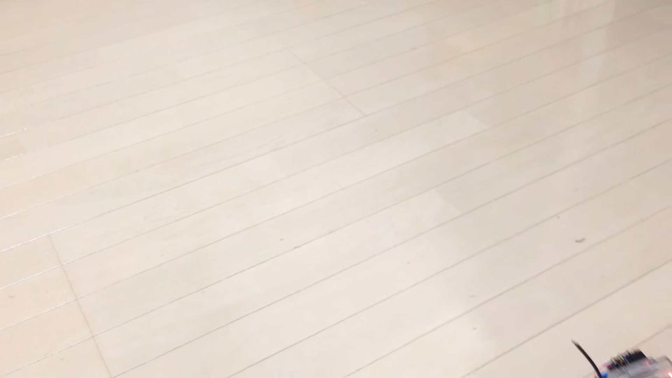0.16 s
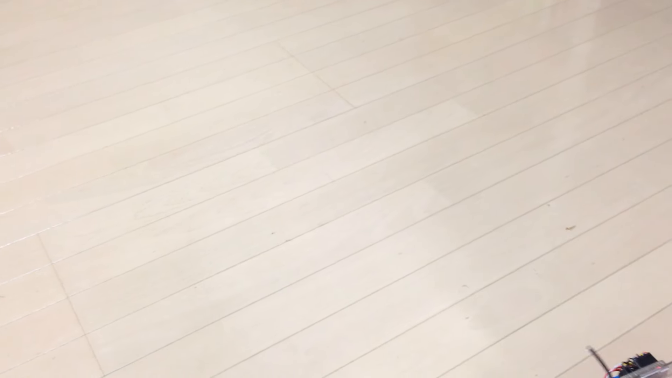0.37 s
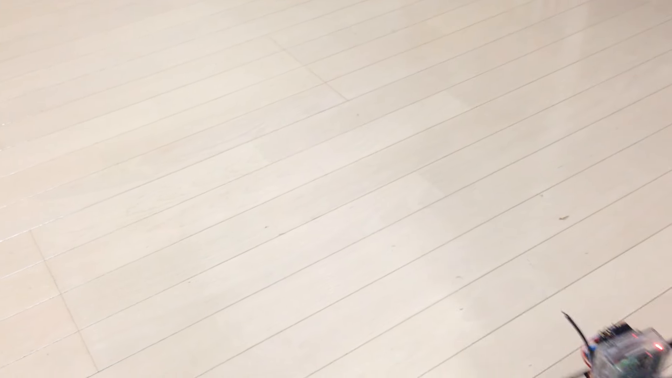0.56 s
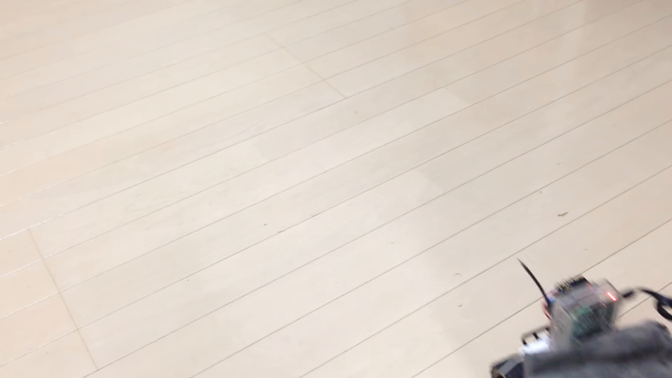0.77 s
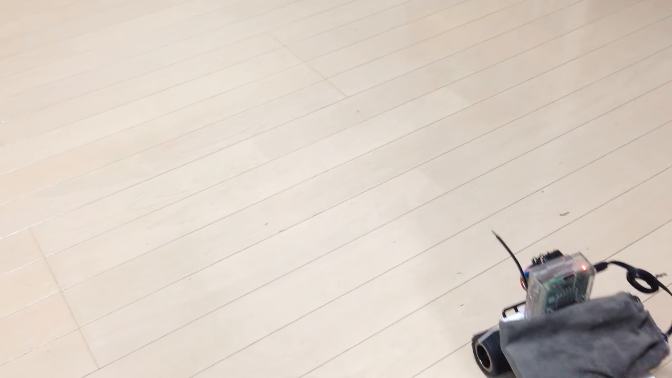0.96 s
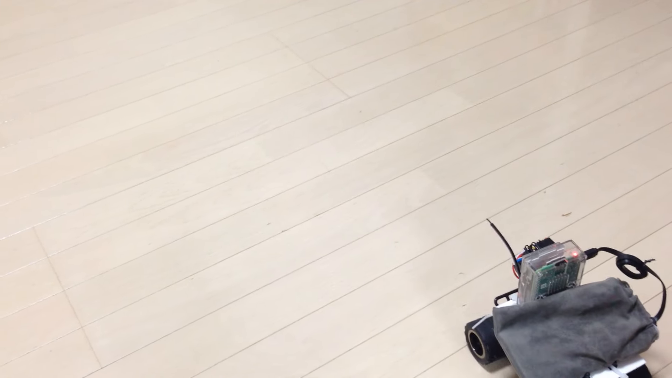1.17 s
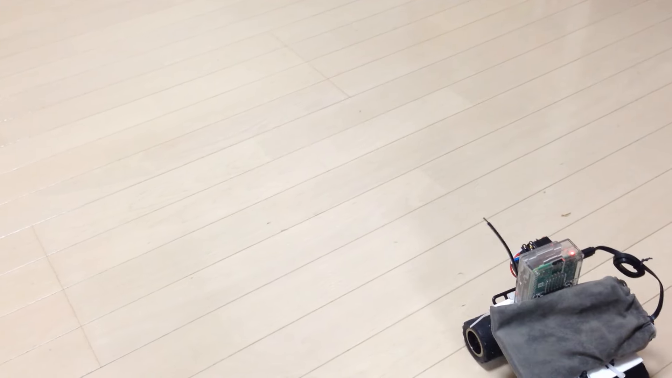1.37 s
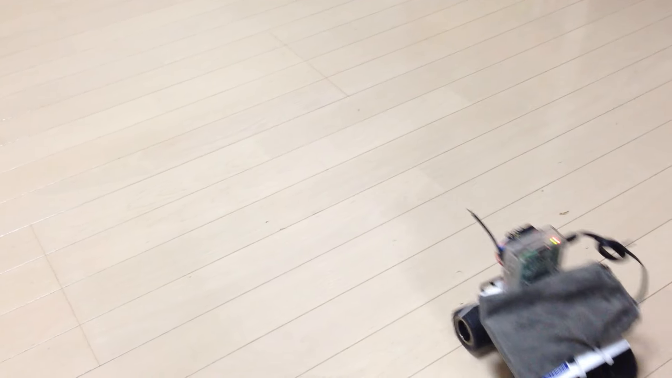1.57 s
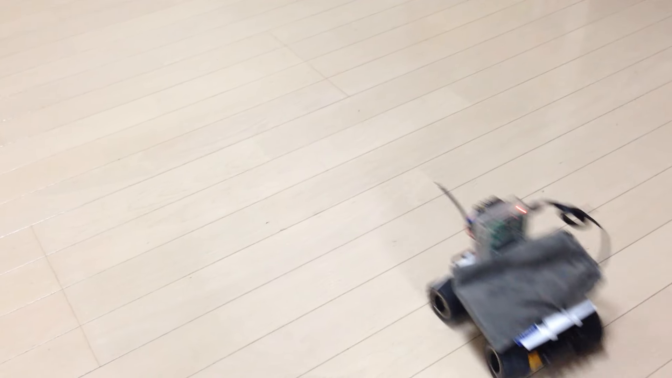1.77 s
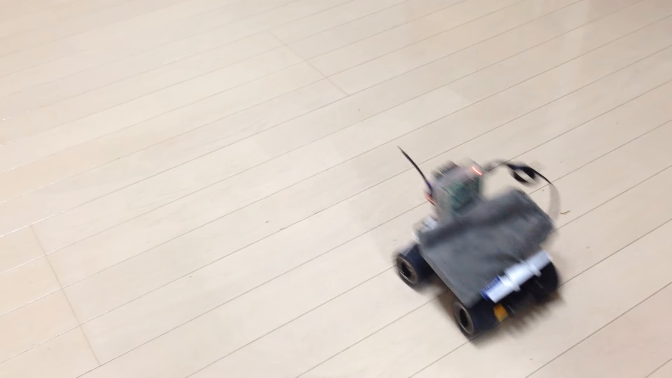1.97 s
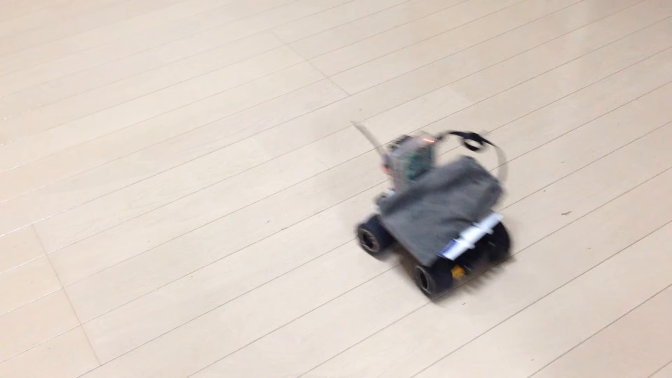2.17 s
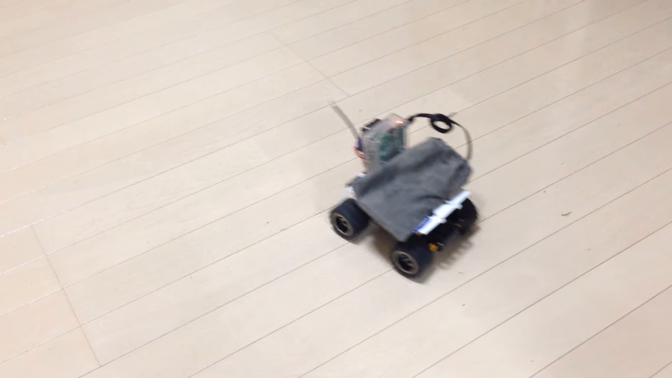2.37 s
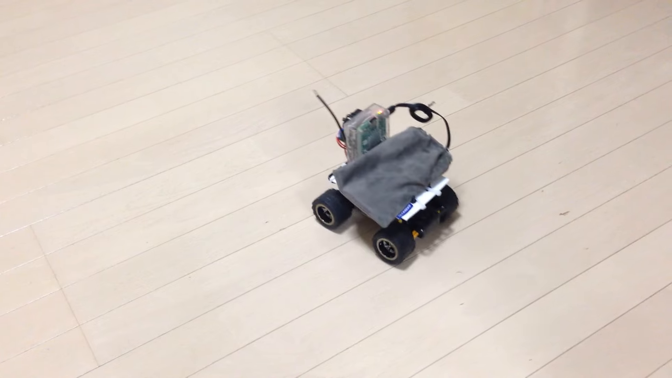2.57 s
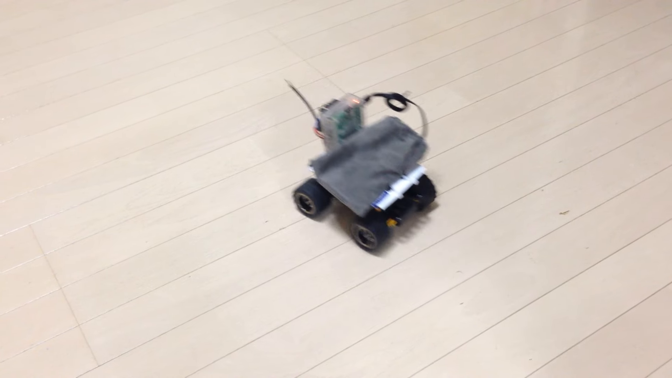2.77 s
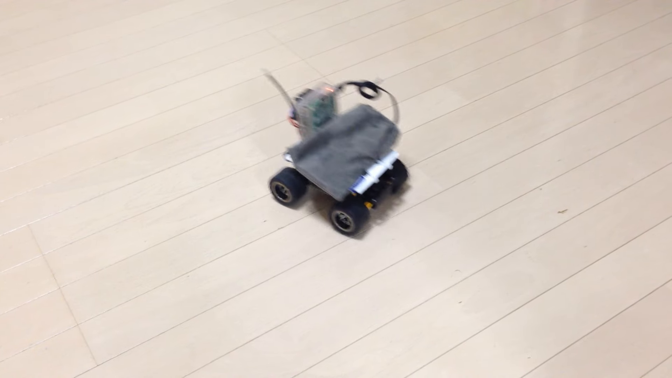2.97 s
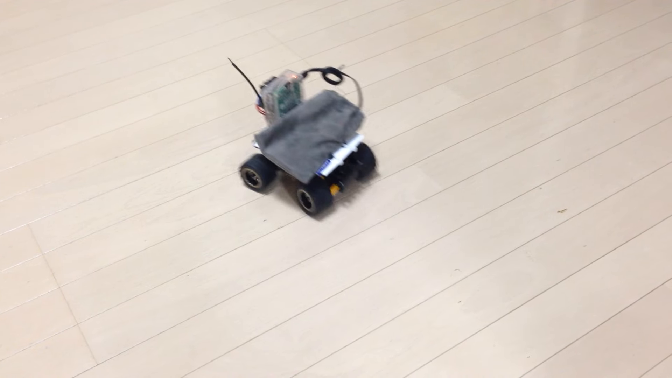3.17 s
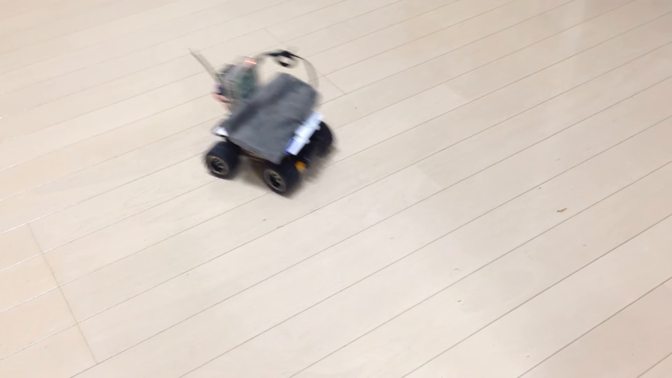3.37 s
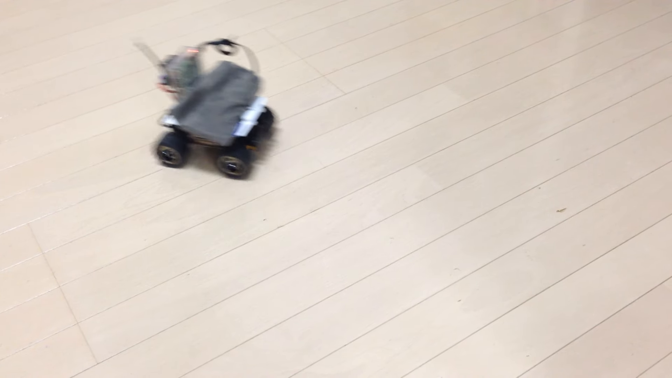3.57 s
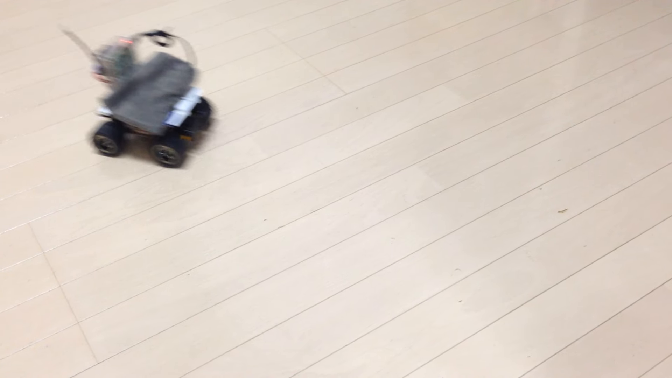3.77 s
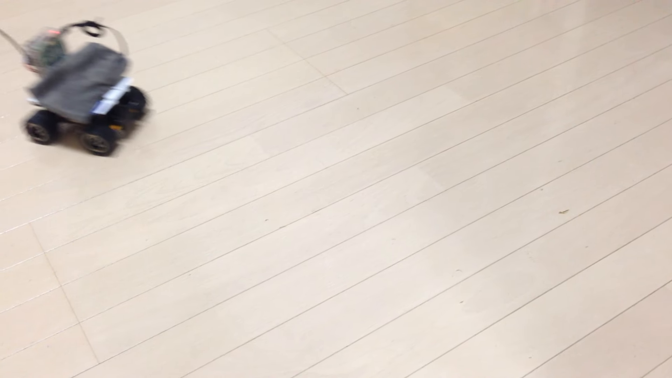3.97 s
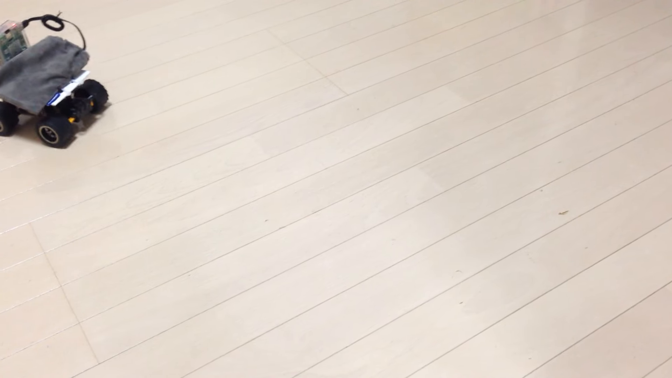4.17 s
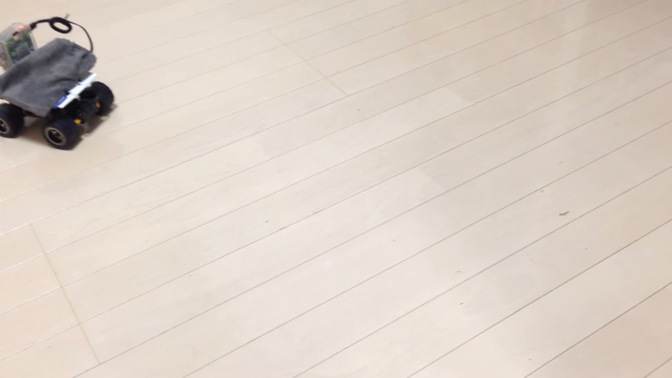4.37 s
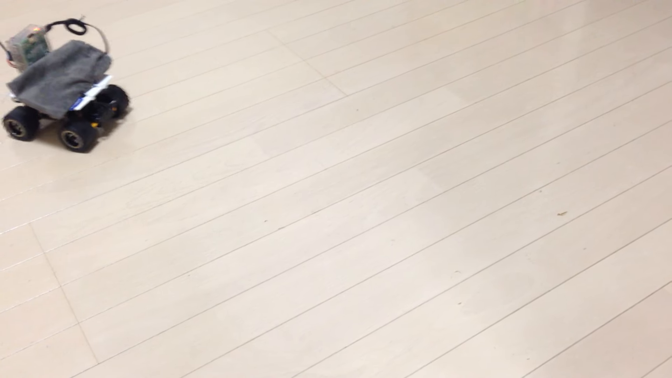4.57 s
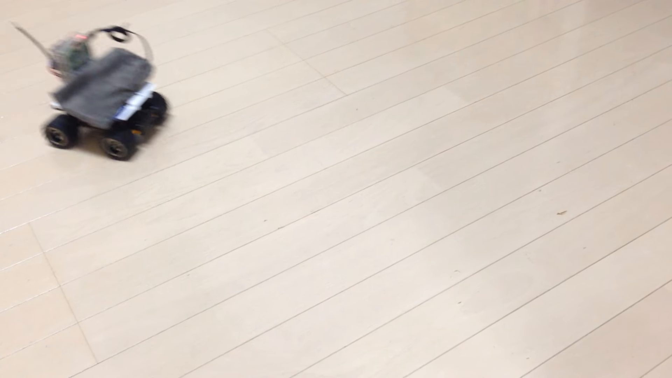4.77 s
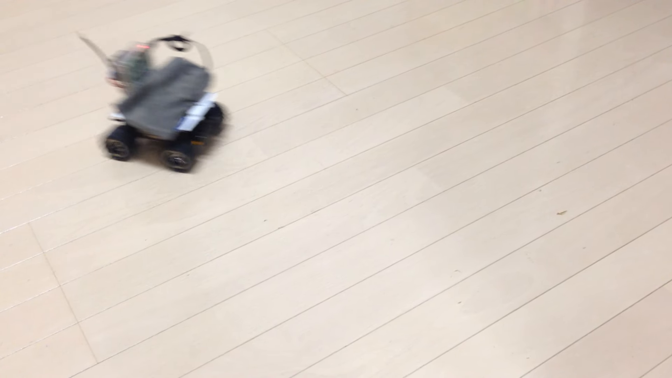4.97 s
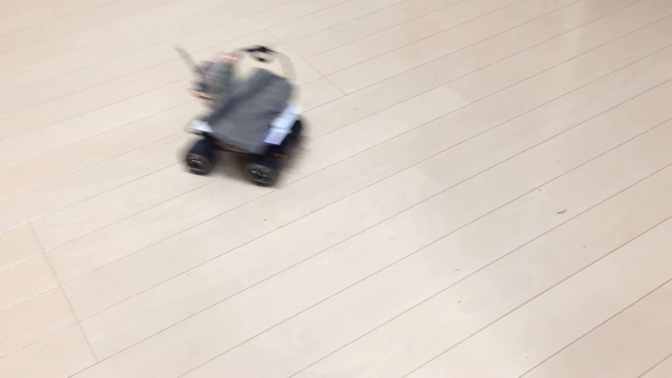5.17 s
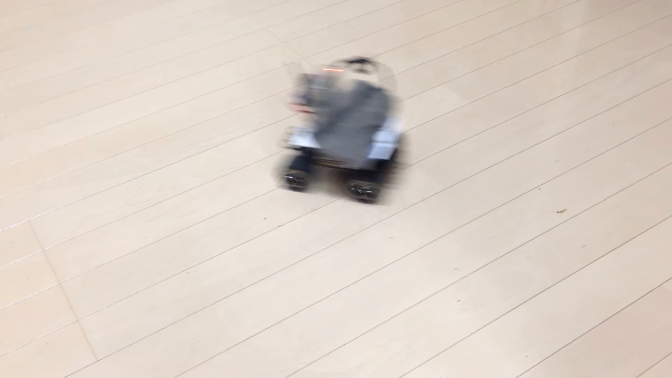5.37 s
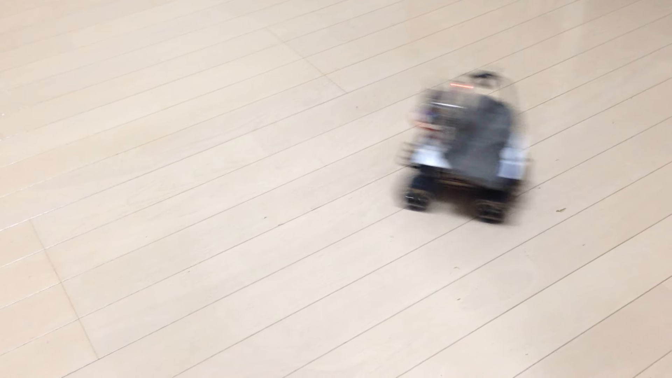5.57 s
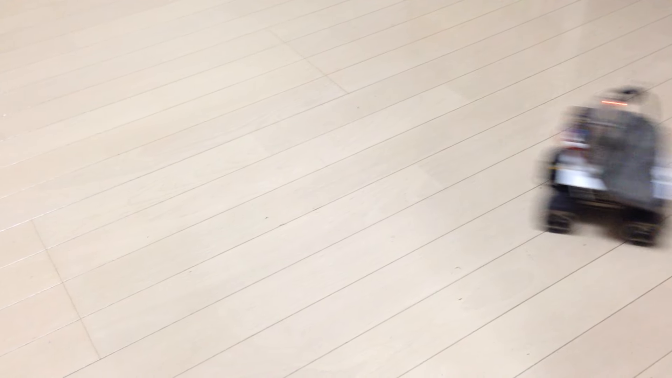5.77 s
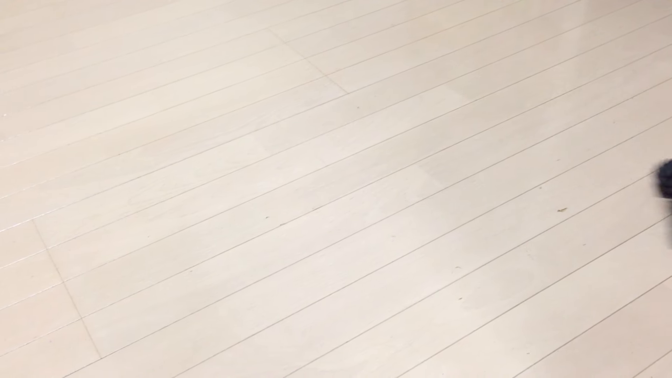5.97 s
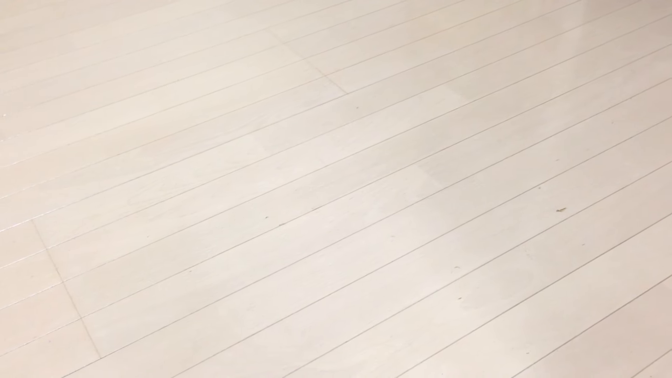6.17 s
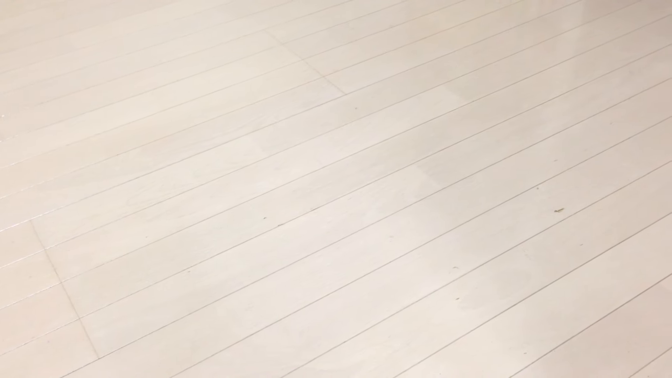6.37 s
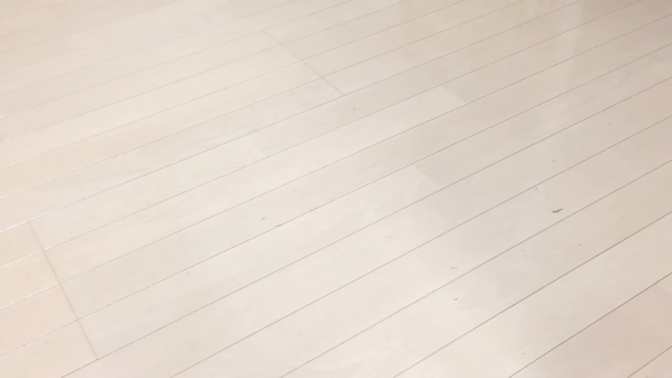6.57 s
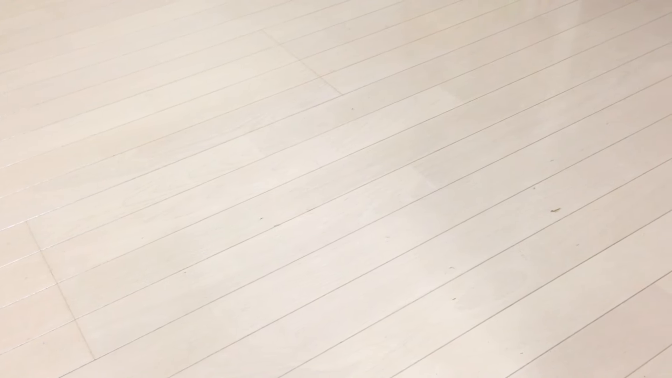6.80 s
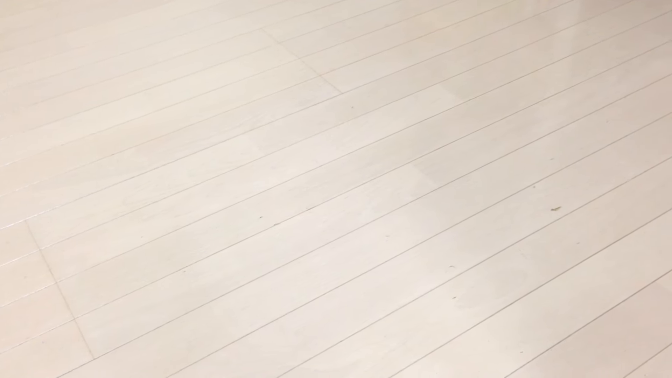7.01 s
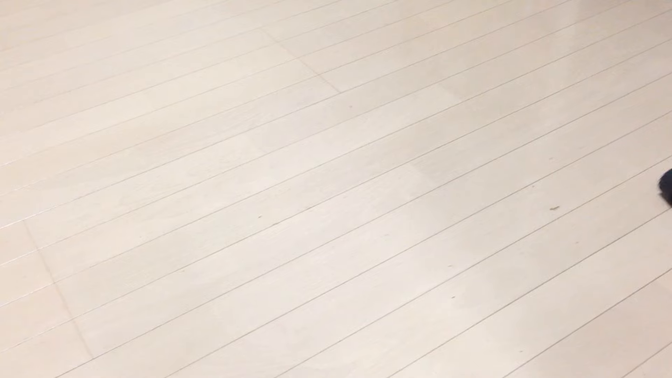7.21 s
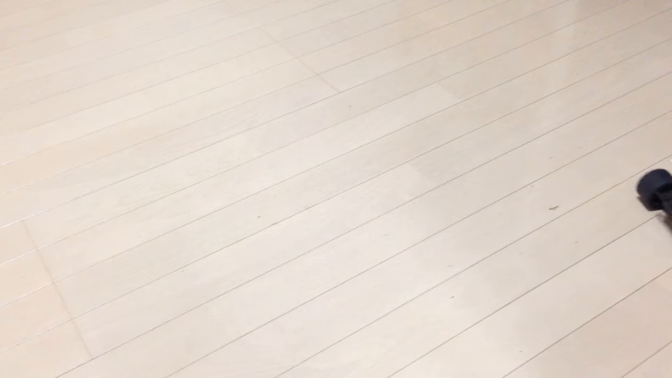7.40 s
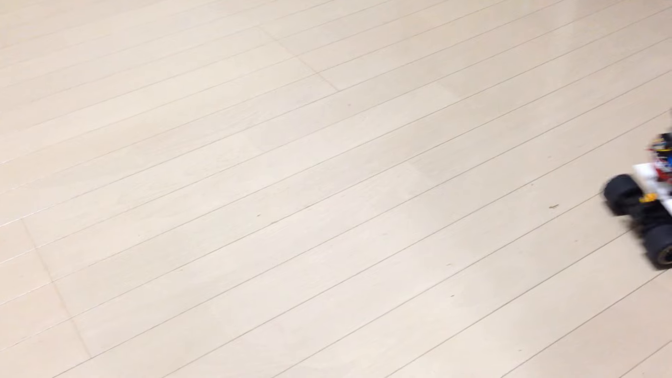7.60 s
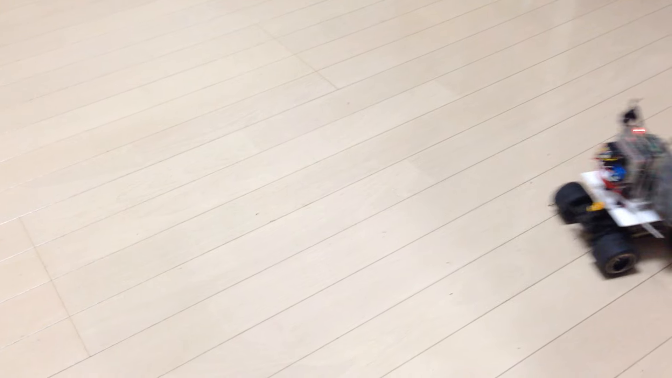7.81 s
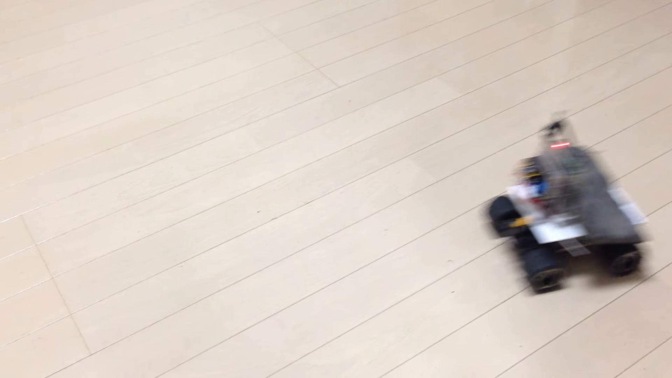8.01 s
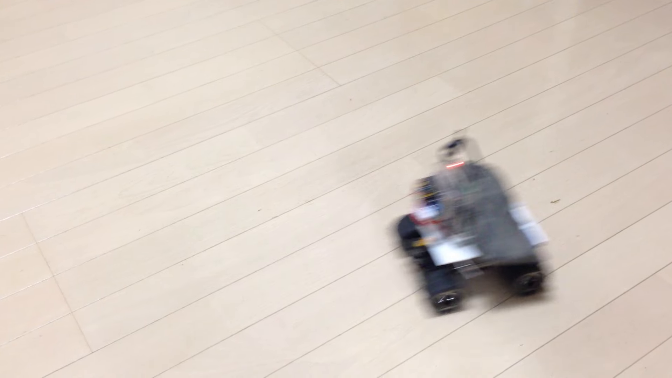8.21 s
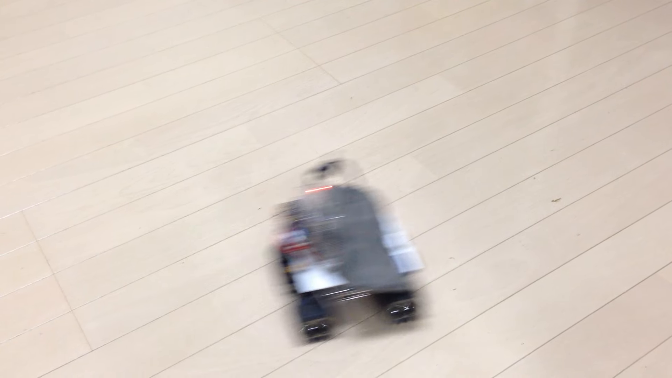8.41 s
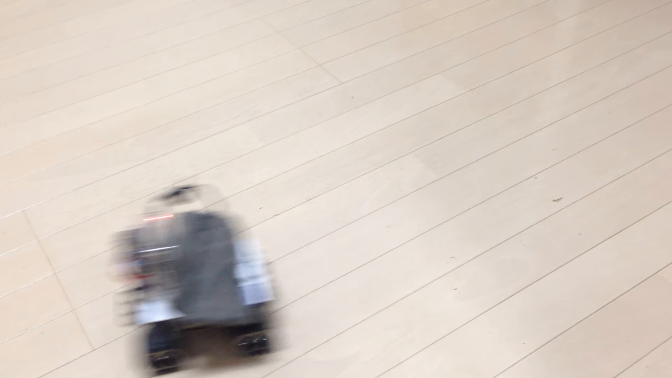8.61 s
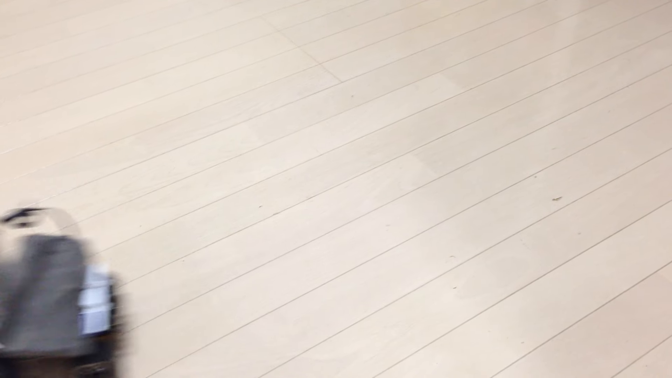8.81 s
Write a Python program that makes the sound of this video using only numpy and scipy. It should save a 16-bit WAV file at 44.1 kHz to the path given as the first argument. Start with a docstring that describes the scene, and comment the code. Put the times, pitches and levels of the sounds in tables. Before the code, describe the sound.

Low rumbling bursts from a toy car's wheels on floorboards, with buzzy gear rattle, brief whines and sharp clicks, stopping and restarting over faint hiss.

```python
"""A low drumming comes first: the tyre lugs of a small toy car, striking a hollow wooden floor in a quiet room.
The car drives in short pushes and rolls on between them; the boards hum and rumble under its wheels.
Plastic gears rattle and sing in the shell, made from tooth impacts, noise and short gliding tones.
Clicks as gear play is taken up, and a knock on the boards, are short decaying rings with a brief room answer.
Microphone hiss and room tone, made from coloured noise, lie under all."""
import sys
import numpy as np
from scipy import signal
from scipy.io import wavfile
from scipy.ndimage import uniform_filter1d

SR = 44100
rng = np.random.default_rng(int(sys.argv[2]) if len(sys.argv) > 2 else 0)


def master(y):
    """Save y as 16-bit WAV."""
    cut = np.clip(np.atleast_2d(y).T, -1, 1)
    pcm = np.round(cut * 32767)  # scale
    wavfile.write(sys.argv[1], SR, pcm.astype(np.int16))


def level_to_linear(level):
    """Convert decibel levels to linear amplitude factors, elementwise."""
    exponent = np.asarray(level, float) / 20
    return 10 ** exponent


N = 390285

# ring of the plastic shell, relative spectrum: f/Hz, level/dB per Hz
SHELL_SPECTRUM = [(1030, -37.5), (1750, -2.5), (2110, 1.5), (2330, 2), (2480, -0.5), (2700, -4), (2930, -2),
                  (3160, 0.5), (4010, 2.5), (4460, -4), (5100, -10.5), (6630, -20), (11200, -120)]
# bright fizz of the gears, relative spectrum: f/Hz, level/dB per Hz
FIZZ_SPECTRUM = [(2820, -36.5), (4800, -4.5), (5040, -5), (5670, -1), (6530, 0), (8530, -0.5), (10700, -5),
                 (11900, -5), (13400, -6.5), (14700, -6), (15400, -51.5)]
# the car rolls on between pushes: t/s, lug rate f/Hz, coasting gears level/dB, coasting tyres level/dB
ROLLING_CAR = [(0.0, 73.4, -58.5, -55.5), (0.45, 67.7, -69.5, -66), (0.8, 69.7, -66.5, -65.5),
               (1.4, 75.6, -71, -71), (1.6, 58.1, -61.5, -64), (1.72, 58.45, -62.5, -62),
               (2.02, 65, -59.5, -55.5), (2.09, 74.9, -61.5, -60), (2.24, 80.8, -63.5, -61.5),
               (2.44, 104.8, -64, -67.5), (2.65, 75, -70, -84), (2.8, 63.6, -66, -59),
               (3.05, 93.5, -67.5, -69), (3.11, 93.2, -80, -63), (3.2, 70.5, -62.5, -59),
               (3.33, 64.7, -62, -65), (3.5, 72.1, -60.5, -62.5), (3.72, 67.6, -58.5, -57.5),
               (3.97, 70.55, -56.5, -58.5), (4.2, 94, -65.5, -59.5), (4.55, 108, -68, -77),
               (5.1, 94, -57.5, -57), (5.32, 84.5, -56, -61), (5.5, 96.5, -53, -53.5), (5.62, 94, -55, -56),
               (5.9, 96.8, -54, -54), (5.98, 84.1, -54, -53.5), (6.16, 75.5, -61.5, -61),
               (6.3, 77.1, -62.5, -56.5), (6.38, 80.8, -60.5, -67), (6.48, 72, -67.5, -72),
               (6.7, 69.3, -72, -83.5), (7.4, 70.7, -69, -72), (7.95, 69.8, -62, -60),
               (8.06, 76.2, -57.5, -54), (8.33, 77.84, -54, -54.5), (8.55, 90.3, -52, -54.5),
               (8.85, 87.6, -56.5, -50.5)]


def evened(x):
    """Scales to rms 1."""
    return x / np.sqrt(np.mean(x ** 2) + 1e-20)


def read(points, hz):
    """Reads a spectrum on a log-frequency axis."""
    f, value = np.transpose(points)
    return np.interp(np.log(hz + 1), np.log(f + 1), value)


def curves(rows):
    """Joins table rows into one curve a column."""
    s, *columns = np.transpose(rows)
    return [np.interp(np.arange(N) / SR, s, c) for c in columns]


def coloured(x, spectrum):
    """Causal minimum-phase filter with the given spectrum, output at rms 1."""
    size = 8192
    hz = abs(np.fft.fftfreq(size, 1 / SR))
    log_gain = np.log(level_to_linear(np.maximum(read(spectrum, hz), -100)))
    taps = np.fft.ifft(np.exp(np.conj(signal.hilbert(log_gain)))).real[:size // 2]
    return evened(signal.oaconvolve(x, taps)[:N])


def resonate(x, hz, width):
    """Shifts hz down to zero, smooths, and shifts back: a resonance of gain 1."""
    turn = np.exp(2j * np.pi * np.cumsum(hz * np.ones(len(x))) / SR)
    r = np.exp(-np.pi * width / SR)
    return 2 * (turn * signal.lfilter([1 - r], [1, -r], x / turn)).real


def drift(seconds):
    """Chance wandering: noise smoothed twice over the given time, rms 1."""
    size = max(round(seconds * SR), 1)
    return evened(uniform_filter1d(uniform_filter1d(rng.standard_normal(N), size), size))


def effort(rows, db, coast_db, rise_s, swell_db, fall_db_per_s, added_swell_db=0):
    """Gain of one layer: every event rises, swells (or sags) while it holds and falls, over the coasting level."""
    start, on = np.transpose(rows)[:2, :, None]
    grid_s = np.arange(0, N / SR, .001)
    t = grid_s - start
    level_db = db[:, None] + (swell_db + added_swell_db) * (np.clip(t / on, 0, 1) - .5)
    level_db = level_db - fall_db_per_s * np.maximum(t - on, 0)
    power = (np.clip(t / rise_s, 0, 1) * level_to_linear(level_db)) ** 2
    return np.sqrt(np.interp(np.arange(N) / SR, grid_s, power.sum(0)) + level_to_linear(coast_db) ** 2)


def hiss():
    """Steady noise of the room tone and the microphone."""
    # relative spectrum: f/Hz, level/dB per Hz
    hiss_spectrum = [(20, -71), (45, 2.5), (75, 0.5), (150, -11), (300, -8), (550, -11.5), (900, -20.5),
                     (1800, -27), (3400, -20.5), (5400, -24.5), (15400, -24)]
    return level_to_linear(-62.5) * coloured(rng.standard_normal(N), hiss_spectrum)


def room(x):
    """Sparse reflections of random sign, each band dying at its own speed."""
    # reverberation of the room: f/Hz, t60/s
    decay_times = [(100, 0.31), (1000, 0.39), (4000, 0.17), (12000, 0.11)]
    taps = np.zeros(SR // 2)
    at = np.arange(150, len(taps) - 20, 20)
    taps[at + rng.integers(0, 20, len(at))] = rng.choice([-1., 1.], len(at))
    hz, t, z = signal.stft(taps, SR, nperseg=256)
    t60 = np.clip(read(decay_times, hz), .05, 1)[:, None]
    tail = signal.istft(z * level_to_linear(-60 * t / t60), SR, nperseg=256)[1]
    return signal.fftconvolve(x, tail / np.linalg.norm(tail))[:N]


def knock():
    """A wheel knocks once on the boards, a dull blow that rings their modes."""
    # board modes: f/Hz, level/dB, t60/s
    knock_modes = [(113, -4, 0.18), (199.4, 3.5, 0.098), (244, -36, 0.064), (443, -9, 0.018)]
    t = np.maximum(np.arange(N) / SR - .1735, 0)
    ring = sum(level_to_linear(db - 60 * t / t60) * np.sin(2 * np.pi * hz * t) for hz, db, t60 in knock_modes)
    return level_to_linear(-32) * ring


def sings():
    """Gears or boards sing at one resonance: a rough, wavering tone swells, sags a little in pitch and fades."""
    # brief tones: t/s, length t/s, middle f/Hz, level/dB
    tones = [(0.139, 0.05, 1125, -51), (2.21, 0.094, 3700, -61.5), (3.321, 0.049, 1770, -58),
             (3.704, 0.042, 1430, -58), (3.81, 0.079, 1002, -59), (3.879, 0.063, 2220, -62),
             (5.114, 0.034, 1083, -52.5), (5.353, 0.073, 1760, -56), (5.524, 0.044, 3200, -49),
             (5.699, 0.071, 1158, -56), (5.71, 0.085, 2310, -52), (5.855, 0.06, 1874, -61),
             (5.9, 0.086, 1864, -55), (5.785, 0.12, 1030, -68), (6.285, 0.063, 1010, -61),
             (6.9, 0.054, 988, -60), (6.94, 0.045, 1693, -63), (3.08, 0.096, 204, -58),
             (0.17, 0.07, 195, -51), (3.711, 0.038, 3750, -57), (3.826, 0.026, 3050, -55),
             (3.823, 0.03, 5400, -57), (8.18, 0.082, 1570, -55), (7.135, 0.05, 1195, -68),
             (6.175, 0.056, 1940, -56), (6.328, 0.062, 1234, -58.5), (8.134, 0.057, 5660, -59.5),
             (8.303, 0.049, 3690, -49), (8.456, 0.043, 3240, -51.5), (8.476, 0.16, 2030, -57),
             (8.631, 0.072, 2310, -45), (8.66, 0.067, 1031, -54.5), (0.69, 0.06, 1520, -63),
             (1.083, 0.067, 3560, -66.5), (5.637, 0.039, 1302, -54), (5.64, 0.08, 262, -48),
             (6.006, 0.056, 4053, -60.5), (6.91, 0.073, 1495, -67), (8.163, 0.041, 4000, -53),
             (8.67, 0.13, 283, -53.5), (6.921, 0.046, 1890, -56), (7.13, 0.066, 1960, -76),
             (8.154, 0.045, 2100, -53), (8.348, 0.0589, 5660, -61), (8.363, 0.044, 1755, -59),
             (8.45, 0.043, 5804, -59)]
    out, waver, flutter = np.zeros(N), drift(0.013), drift(0.0049)
    for s, length, hz, db in tones:
        at = round(s * SR) + np.arange(round(length * SR))
        sag = np.linspace(.015, -.015, len(at))
        tone = np.sin(2 * np.pi * np.cumsum(hz * (1 + sag + 0.009 * waver[at])) / SR)
        out[at] += level_to_linear(db + 3.5 * flutter[at]) * np.sqrt(2) * tone * np.hanning(len(at))
    return out


def clicks():
    """A short snap with one ring of its own and two shared rings, and a short rattle that builds more slowly."""
    # gear play taken up, and knocks: t/s, strike level/dB, own ring f/Hz, fizz level/dB against it, rise t/ms
    strikes = [(0.108, -48, 3440, -8, 1.5), (0.126, -32.5, 4040, -15, .8), (0.15, -28.5, 3200, -5, 1.6),
               (0.174, -35.5, 1130, -29, 3), (0.359, -37, 1050, -19, 5.9), (1.292, -40, 4730, -12, 7),
               (1.582, -37, 3680, -8, 2), (1.77, -37, 1040, -10, 3), (1.994, -31, 3630, -15, 7),
               (2.233, -37, 3560, -5, 1.2), (2.496, -33.5, 4830, -8, 2), (2.867, -37.5, 4820, -4.5, 2.16),
               (3.028, -35, 1214, -16, 1.63), (3.187, -43.5, 3670, 1, 2.8), (3.432, -35, 3250, -11, 5),
               (3.551, -38, 1230, -7, 3.7), (3.649, -29, 3600, -12, 7), (3.83, -34.5, 1050, -4, 4.64),
               (4.373, -34, 1089, -19, 6.8), (4.657, -34.5, 1260, -18, 1.98), (4.792, -38.5, 1286, -4, 4.1),
               (4.973, -32, 3555, -10, 5.1), (5.126, -27, 1270, -16, 4.4), (5.314, -28, 1167, -17, 4),
               (5.468, -23.5, 4100, -20, 3.65), (5.658, -28.5, 4100, -14, 1.2),
               (5.689, -27, 1260, -16, 3.6), (5.788, -35, 5400, 0, 6), (6.333, -29, 1020, -10, 7.4),
               (7.887, -33.5, 3426, -20, 4), (8.018, -29, 1830, -9, 6.6), (8.075, -31.5, 3300, -11, 4.2),
               (8.161, -30, 1060, -7.5, 4.2), (8.289, -41, 3190, -14, 3.9), (8.312, -35, 3750, -3, 3.74),
               (8.448, -27, 3490, -3.5, 4.96), (8.57, -46, 4778, -8, 3.15), (8.62, -37.5, 4080, 7, 2.2),
               (8.748, -46, 5600, -1, 4)]
    # every click also rings these: f/Hz, level/dB, t60/s
    crack_modes = [(3270, -10.5, 0.012), (4165, -18.5, 0.036)]
    out, t = np.zeros(N + SR), np.arange(SR // 4) / SR
    bright = coloured(rng.standard_normal(N), FIZZ_SPECTRUM)
    dull = coloured(rng.standard_normal(N), SHELL_SPECTRUM)
    for s, db, hz, fizz_db, rise_ms in strikes:
        at = round(s * SR) + np.arange(len(t))
        ring = level_to_linear(-12.0 - 60 * t / 0.045) * np.sin(2 * np.pi * hz * t)
        ring += sum(level_to_linear(d - 60 * t / t60) * np.sin(2 * np.pi * f * t) for f, d, t60 in crack_modes)
        snap = level_to_linear(fizz_db + 0.5 - 60 * t / 0.014) * bright[at % N]
        rattle = level_to_linear(-21.0) * dull[at % N] + level_to_linear(fizz_db - 15.0) * bright[at % N]
        rattle = level_to_linear(-60 * t / 0.17) * rattle
        attack = np.minimum(t * 1000 / rise_ms, 1)
        out[at] += level_to_linear(db) * ((ring + snap) * attack + rattle * np.minimum(t / 0.014, 1))
    return out[:N]


def tyres():
    """Lugs strike the boards nearly evenly; the boards answer with a hum, its overtones and their own modes."""
    # the tyres bite and shake the boards: start t/s, grip t/s, drumming level/dB,
    # upper rumble level/dB, wheel hop at twice the lug rate level/dB
    grips = [(0, 0.14, -49, -62, -58), (0.1, 0.1, -45, -46, -45.5), (0.309, 0.11, -50, -51, -51),
             (0.65, 0.13, -48, -58.5, -66), (1.31, 0.078, -63, -65, -66), (1.549, 0.15, -44, -53, -44),
             (1.76, 0.16, -58, -57.5, -55), (1.99, 0.1, -47, -65, -58), (2.21, 0.084, -60, -57, -68),
             (2.49, 0.057, -60, -58, -64), (2.73, 0.088, -46, -58, -56), (2.93, 0.033, -73, -62, -80),
             (3.02, 0.09, -42.5, -55.5, -68), (3.29, 0.13, -49, -62.5, -77), (3.42, 0.064, -55, -57.5, -65),
             (3.64, 0.12, -46, -64, -68), (3.84, 0.14, -61, -54.5, -74), (4.19, 0.034, -52, -59, -68),
             (4.36, 0.024, -52.5, -50.5, -63), (4.65, 0.03, -76, -53.5, -57.5),
             (4.79, 0.061, -75, -53.5, -53.5), (5.031, 0.18, -54, -62, -57.5), (5.3, 0.026, -46, -51, -63),
             (5.46, 0.08, -41.5, -66, -71), (5.64, 0.076, -45, -50, -54), (5.78, 0.08, -45, -54, -49.5),
             (5.97, 0.067, -45.5, -59, -56), (6.1, 0.11, -47, -46, -56), (6.26, 0.12, -42, -45, -53.5),
             (6.41, 0.047, -46.5, -74, -70), (6.5, 0.036, -54, -61, -75), (6.863, 0.12, -38, -51.5, -51),
             (7.11, 0.096, -40.5, -55.5, -51.5), (7.481, 0.11, -45.5, -47.5, -57),
             (7.689, 0.12, -42.5, -52.5, -49.5), (7.87, 0.084, -47.5, -53.5, -51.5),
             (8.01, 0.079, -45.5, -59, -52), (8.329, 0.12, -42, -58, -66), (8.48, 0.051, -38, -61, -64),
             (8.61, 0.1, -44.5, -50.5, -60), (8.7, 0.079, -53, -61, -59)]
    # rumble of the boards, relative spectrum: f/Hz, level/dB per Hz
    board_spectrum = [(71, -21.5), (120, 2.5), (135, 2.5), (195, -4), (221, -4), (275, -7), (313, -33),
                      (350, -27), (460, -33), (770, -120)]
    # board resonances: f/Hz, width f/Hz of the first of two passes (the second is twice as wide), level/dB
    board_modes = [(108, 16, 2.5), (156.6, 34, -1), (208.3, 16.8, -1.5), (280, 37, -11.5), (398, 42, -14)]
    lug_hz, _, coast_db = curves(ROLLING_CAR)
    drum_db, rumble_db, hop_db = np.transpose(grips)[2:]
    angle = 2 * np.pi * np.cumsum(lug_hz * (1 + 0.02853 * drift(0.0191))) / SR

    # uneven boards shake the wheels
    loose = evened(resonate(resonate(rng.standard_normal(N), 85.3, 32), 51.0, 61))
    drum = level_to_linear(-0.5 + 1.3 * drift(0.056)) * np.sin(angle) + level_to_linear(-8.0) * loose
    drum = drum * effort(grips, drum_db, coast_db, rise_s=0.029, swell_db=0., fall_db_per_s=143)

    hops = level_to_linear(1.4 * drift(0.14)) * np.sin(2 * angle)
    hops = hops * effort(grips, hop_db, coast_db - 6.5, rise_s=0.025, swell_db=0., fall_db_per_s=430)

    bumps = rng.standard_normal(N)
    modes = sum(level_to_linear(db) * evened(resonate(resonate(bumps, f, w), f, 2 * w)) for f, w, db in board_modes)
    rumble = level_to_linear(-6.5) * coloured(bumps, board_spectrum) + level_to_linear(-2) * evened(modes)
    rumble = rumble + level_to_linear(-13.0 + 3.9 * drift(0.057)) * np.sin(3 * angle)
    rumble = rumble * level_to_linear(1.1 * drift(0.029))
    rumble = rumble * effort(grips, rumble_db, coast_db - 1.5, rise_s=0.037, swell_db=0.75, fall_db_per_s=276)
    return drum + hops + rumble


def teeth(per_s, spread_db):
    """Tooth impacts of uneven size and random sign at chance moments, rms 1."""
    size = level_to_linear(spread_db * np.minimum(rng.exponential(1, N), 5)) * rng.choice([-1., 1.], N)
    return evened(size * (rng.random(N) < per_s / SR))


def tonal_grain(per_s, long_s, glide):
    """Short gliding tones at chance moments, scattered in pitch, give the rattle a tonal grain."""
    out = np.zeros(N)
    for hz in np.linspace(350, 6200, num=60):
        t = np.arange(round(long_s * rng.uniform(0.54, 1.97) * SR)) / SR
        bend = 1 + glide * rng.standard_normal() * t / t[-1]
        tone = np.sin(2 * np.pi * np.cumsum(hz * rng.uniform(1.0, 1.03) * bend) / SR) * np.hanning(len(t))
        starts = (rng.random(N) < per_s / SR) * level_to_linear(3 * np.minimum(rng.exponential(1, N), 2))
        out += signal.oaconvolve(starts, tone)[:N]
    return evened(out)


def patchy(x, patchy_db, wide_hz, long_s):
    """Random patches in time and pitch make the gear noise uneven."""
    hz, t, z = signal.stft(x, SR, nperseg=512, noverlap=384)
    field = rng.standard_normal(z.shape)
    for axis, size in enumerate([wide_hz / hz[1], long_s / (t[1] - t[0])]):
        kernel = np.exp(-(np.arange(-40, 41) / size) ** 2)
        field = signal.oaconvolve(field, np.expand_dims(kernel, 1 - axis), "same")
    gain = level_to_linear(patchy_db * evened(field))
    return signal.istft(z * evened(gain), SR, nperseg=512, noverlap=384)[1][:N]


def gears():
    """Tooth impacts and brush noise, with a tonal grain, ring the shell in a low, a rattling and a fizzing band."""
    # the motors push in short pulses: start t/s, power on t/s, gear rattle level/dB,
    # strain (low shell against the rattle) level/dB, fizz against the rattle level/dB
    pushes = [(0.029, 0.036, -55, -6.5, -5.5), (0.105, 0.012, -56.5, 0.5, -9), (0.127, 0.049, -50.5, 1, -9),
              (0.359, 0.036, -58, 1, -5), (0.645, 0.13, -59, -5, -9.5), (1.1, 0.049, -63, -11, -8),
              (1.29, 0.06, -61.5, -14, -4), (1.545, 0.13, -64.5, 3.5, -5), (1.77, 0.041, -59.5, -4, -10.5),
              (1.99, 0.1, -60.5, -2, -16), (2.22, 0.07, -58.5, -9, -6), (2.488, 0.051, -59.5, -4.5, -0.5),
              (2.724, 0.12, -62.5, -0.5, -10), (2.86, 0.071, -61.5, -3, -6),
              (3.02, 0.11, -55.5, -4.5, -6.5), (3.18, 0.05, -63, -18, -13), (3.29, 0.1, -63, -3.5, -18),
              (3.43, 0.092, -59, -4, -18), (3.639, 0.087, -56.5, -3, -6), (3.83, 0.1, -53, -11, -11),
              (4.09, 0.07, -58.5, -9, -5.5), (4.19, 0.076, -59, -7, -5.5), (4.37, 0.027, -57.5, -1.5, -4),
              (4.65, 0.06, -59, -1.5, -6), (4.79, 0.058, -53.5, -6.5, -10), (4.97, 0.092, -54, -6, -19),
              (5.11, 0.083, -51.5, -7.5, -7.5), (5.249, 0.023, -54.5, -18, -4),
              (5.31, 0.064, -52, -10.5, -6), (5.459, 0.084, -47.5, -12, -6.5), (5.585, 0.023, -62, -14, 6),
              (5.657, 0.095, -47.5, -12.5, -3), (5.8, 0.086, -62, -18, 5), (5.98, 0.081, -65, -17, 4),
              (6.1, 0.08, -57.5, 1, -14), (6.275, 0.092, -59.5, 0, -17), (6.855, 0.1, -59.5, 0.5, -5),
              (6.91, 0.04, -68.5, 5, -4), (7.105, 0.1, -59, -2.5, -8), (7.134, 0.068, -63.5, 3, -6),
              (7.473, 0.11, -60.5, 3, -5), (7.683, 0.084, -55, -2, -8), (7.88, 0.098, -54, -5, -8),
              (8.019, 0.078, -54, -6, -5), (8.17, 0.048, -51, -12, -12), (8.29, 0.087, -51.5, -7.5, -2.5),
              (8.449, 0.06, -53.5, -4.5, 2), (8.56, 0.014, -60, -7, 6), (8.62, 0.084, -50.5, -9, 0),
              (8.74, 0.02, -57, -4, 2.5)]
    # as the car turns, other sides of its gearbox face the listener:
    # t/s, high rasp level/dB, upper rattle level/dB, both against the rattle
    facing = [(0, -33, -12), (1, -33, -8.5), (2, -25, -18), (3, -23, -20), (4, -21, -11.5),
              (4.9, -27, -9.5), (5.5, -19, 0.5), (6, -18, -3), (6.5, -25, -14), (7.3, -23, -10),
              (7.7, -25, -12), (8, -15, -10), (8.2, -20, -9), (8.5, -25, -12), (8.85, -25, -13)]
    # low ring of the shell, relative spectrum: f/Hz, level/dB per Hz
    low_spectrum = [(180, -25.5), (300, -3), (318, -7.5), (395, -11), (488, -9), (799, -7.5), (1080, -2),
                    (1700, -7), (2210, -20), (3740, -120)]
    gear_db, strain_db, fizz_db = np.transpose(pushes)[2:]
    coast_db = curves(ROLLING_CAR)[1]
    stall_db = 1.5 * np.exp(0.46 * strain_db)[:, None]  # a strained gear train swells more

    # one random wobble in loudness is shared by the tooth impacts and noise
    wobble = level_to_linear(0.97 * drift(0.029) + 0.099 * drift(0.0052))
    drive = (teeth(1900, 1.64) + 0.93 * rng.standard_normal(N)) * wobble
    grain_fade_db = .55 * np.minimum(coast_db + 56, 0)  # the grain fades where the coasting gears are below -56 dB
    meshing = drive + level_to_linear(-11 + grain_fade_db) * tonal_grain(4.2, 0.0414, 0.0284)

    rasp = evened(resonate(resonate(meshing, 5700, 330), 5700, 330))
    upper = evened(resonate(resonate(meshing, 3860, 620), 3860, 620))
    rasp_db, upper_db = curves(facing)
    sides = level_to_linear(rasp_db + 3.5 * drift(0.027)) * rasp + level_to_linear(upper_db + 1.5 * drift(0.01)) * upper

    rattle_gain = effort(pushes, gear_db, coast_db, 0.013, 0., 160, stall_db)
    low_gain = effort(pushes, gear_db + strain_db, coast_db - 6.5, 0.014, 0.36, 244, stall_db)
    fizz_gain = effort(pushes, gear_db + fizz_db, coast_db - 4.5, 0.0043, -0.77, 300, stall_db)
    shell = rattle_gain * (coloured(meshing, SHELL_SPECTRUM) + sides)
    shell = shell + low_gain * coloured(meshing, low_spectrum)

    fizz = coloured(0.21 * drive + 1.3 * meshing + level_to_linear(-14.5) * teeth(60, 3.3), FIZZ_SPECTRUM)
    fizz = fizz_gain * level_to_linear(0.7 * drift(0.012)) * patchy(fizz, 1.15, 580, 0.015)
    return patchy(shell, 2.8, 61, 0.021) + fizz


def scene():
    """The car, the room's answer to its sharp sounds, and the hiss."""
    sharp = clicks() + knock()
    return (hiss() + level_to_linear(-7.0) * room(sharp) + sharp + sings() + tyres() + gears())[None]


def top_cut(x):
    """Nothing passes above the cut-off."""
    return signal.sosfilt(signal.butter(12, 15850, fs=SR, output="sos"), x)


def record(dry):
    """The microphone cuts the deepest bass below 38 Hz and the top above 15600 Hz."""
    cut = signal.sosfilt(signal.butter(4, 38, "high", fs=SR, output="sos"), dry)
    edge = signal.firwin(511, 15600, window=("kaiser", 9), fs=SR)
    finished = signal.oaconvolve(cut, edge[None], "same")
    return top_cut(finished)


dry = scene()
out = record(dry)
master(out)
```